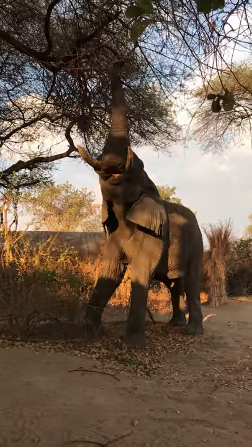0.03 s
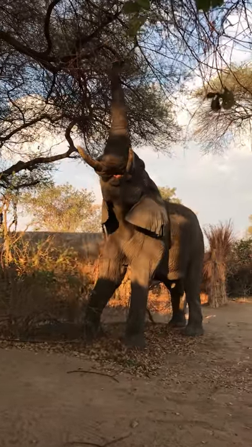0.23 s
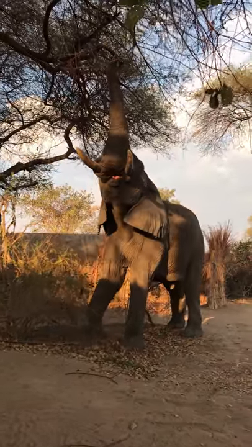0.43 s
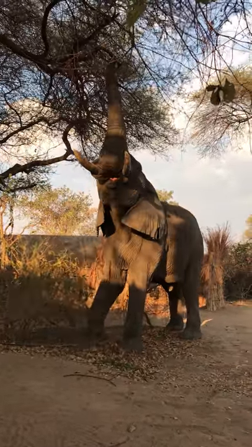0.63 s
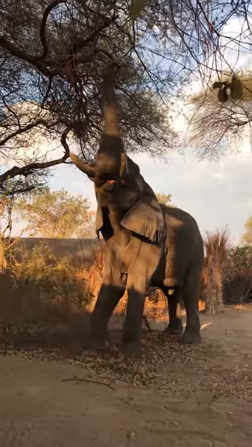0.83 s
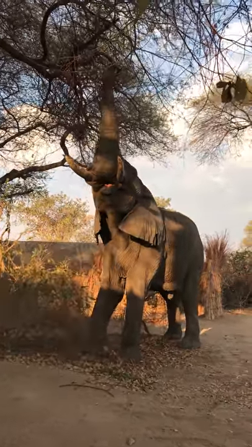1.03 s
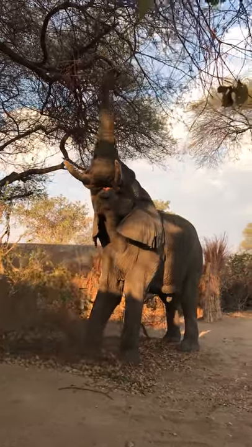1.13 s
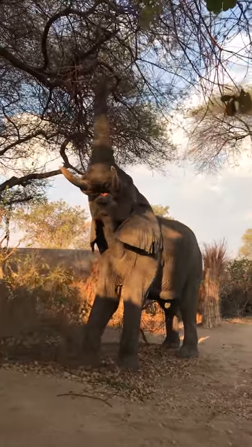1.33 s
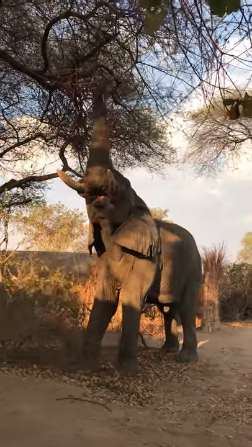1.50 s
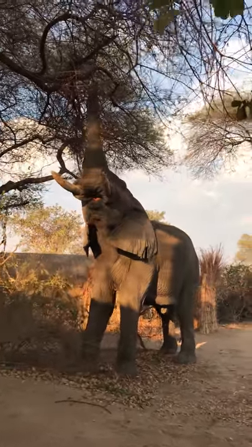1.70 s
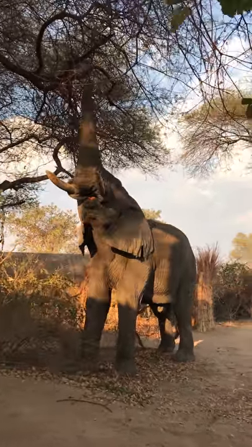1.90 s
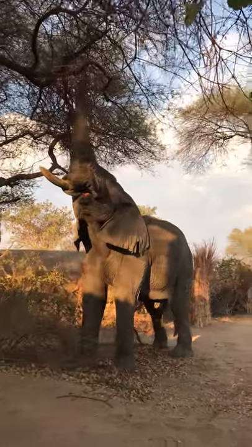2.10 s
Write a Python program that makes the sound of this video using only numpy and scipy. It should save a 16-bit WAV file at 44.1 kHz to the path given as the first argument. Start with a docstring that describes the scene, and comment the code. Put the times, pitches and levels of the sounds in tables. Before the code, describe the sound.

Dry foliage rustles in one long swell as an elephant pulls at a tree. Twigs snap and branches knock softly, then the rustle sinks to a few faint snaps, heard across open ground in quiet outdoor air.

```python
"""An elephant hauls on a thorn tree's crown with its trunk; mono, across open ground.
First, quiet outdoor air and a few twigs snapping, each a run of fibre cracks. By 0.4 s thousands of
dry leaves and twigs tick against each other in one long swell. Up to 1.4 s thick branches knock
and louder twigs snap, over soft, deep bumps. Then the rustle sinks, leaving a few faint snaps."""
import sys
import numpy as np
from scipy import signal
from scipy.io import wavfile
from scipy.ndimage import uniform_filter1d

SR = 44100
rng = np.random.default_rng(int(sys.argv[2]) if len(sys.argv) > 2 else 0)


def master_out(mix):
    """Clip the mix to full scale and print it as 16-bit PCM to the path in sys.argv[1]."""
    frames = np.transpose(np.atleast_2d(mix))
    ceiling = np.clip(frames, -1, 1)
    pcm = np.round(ceiling * 32767).astype(np.int16)
    wavfile.write(sys.argv[1], SR, pcm)


N = 94815

# shake of the crown: t/s, level/dB
SHAKE_ENVELOPE = [(0, -61.5), (.17, -55), (.2, -53.5), (.29, -52.5), (0.381, -43), (.45, -43), (.5, -41),
                  (.56, -42), (.68, -39.5), (.8, -40.5), (.87, -39.5), (1.02, -40.5), (1.16, -44.3),
                  (1.255, -40.5), (1.285, -43), (1.35, -39), (1.44, -45), (1.53, -48.5), (1.62, -54.5),
                  (1.72, -56.5), (1.87, -52.5), (2.02, -61), (2.15, -53.5)]
# dry foliage rustle, including the microphone's dip near 10.5 kHz: f/Hz, relative level/dB
RUSTLE_SPECTRUM = [(60, -15), (130, -8.5), (190, -13), (265, -4.5), (330, -9.5), (460, -11), (800, -10.5),
                   (1100, -4), (2000, -2.5), (3000, -1), (4200, 1), (4900, -2), (5400, 0), (6500, -0.5),
                   (7600, -4.5), (9500, -3), (10400, -9.5), (11900, -4.5), (14000, -9), (16000, -20.5)]
# extra filter on single ticks: f/Hz, level/dB
TICK_EQ = [(300, -9.5), (1500, -6), (4000, -0.5), (8000, -0.5), (15000, 5)]


def rustle(peak_ticks_per_s=2600, ticks_db=-6, hiss_db=-0.5, clump_db=2, swish_db=0.7):
    """A harder shake makes leaves collide more often and more strongly."""
    shake = amp(np.interp(np.arange(N) / SR, *np.transpose(SHAKE_ENVELOPE)))
    crowding = (shake / shake.max()) ** 0.7
    clumps = wander(step_s=0.011)  # leaves collide in clumps
    ticks = leaf_ticks(peak_ticks_per_s * crowding, low_hz=840, high_hz=15340, spread_db=3)
    ticks = ticks / np.sqrt(crowding) * amp(clump_db * clumps)  # power independent of rate
    ticks = unit(scatter(colour(colour(ticks, RUSTLE_SPECTRUM), TICK_EQ)))
    hiss = unit(colour(leaf_hiss(), RUSTLE_SPECTRUM) * amp(swish_db * clumps))
    return shake * (amp(ticks_db) * ticks + amp(hiss_db) * hiss)


def leaf_ticks(rate_per_s, low_hz, high_hz, spread_db, pitches=32, decay_cycles=2.1):
    """Sparse contacts, each ringing one leaf or twig for a few cycles."""
    out, t = np.zeros(N), np.arange(SR // 100) / SR
    sizes = amp(spread_db * np.minimum(rng.exponential(1, N), 3.6))
    contacts = rng.random(N) < rate_per_s / SR
    pitch_index = rng.integers(0, pitches, N)
    impulses = sizes * contacts * rng.choice([-1, 1], N)
    for k, hz in enumerate(np.linspace(low_hz, high_hz, pitches)):
        ring = np.sin(2 * np.pi * hz * t) * np.exp(-t * hz / decay_cycles)
        out += signal.oaconvolve(impulses * (pitch_index == k), unit(ring))[:N]
    return unit(out)


def leaf_hiss(patch_db=0.5, frame=256):
    """Countless faint leaf contacts merge into a patchy hiss."""
    spectrogram = signal.stft(rng.standard_normal(N), nperseg=frame)[2]
    patches = uniform_filter1d(rng.standard_normal(spectrogram.shape), size=6, axis=0)
    patches = unit(uniform_filter1d(patches, size=8, axis=1))
    return signal.istft(spectrogram * amp(patch_db * patches), nperseg=frame)[1][:N]


# twig breaks: t/s, level/dB, tear time/s, tilt/(dB/octave)
TWIG_BREAKS = [(.044, -50, 0.00061, -3), (.084, -46, 0.00058, 12), (.185, -34.5, 0.00079, 12),
               (.187, -47, 0.0044, -3.5), (0.2147, -47.5, 0.0065, -2), (.2495, -53, 0.0036, -4.5),
               (.4763, -29, 0.0024, 5), (.7625, -35, 0.00088, -3), (0.7656, -36.5, 0.007, -0.5),
               (.8615, -28.5, 0.001, -2.5), (.981, -28, 0.0013, 3), (.994, -34.5, 0.0053, 0),
               (1.0825, -35.5, 0.0035, -3.5), (1.0988, -33.5, .003, -1.5), (1.104, -36.5, 0.0047, 3),
               (1.291, -29.5, 0.0018, 1.5), (1.2935, -31, 0.002, 16.5), (1.3281, -34, 0.0022, 2),
               (1.361, -34, 0.0019, 1.5), (1.5285, -42.5, 0.0017, 0), (1.673, -47, 0.0018, -3.5),
               (1.846, -49.5, .012, -3.5), (2.0455, -45.5, 0.0018, 7), (2.1252, -49.5, 0.0027, 2)]
# snapping twigs, including the microphone's dip near 10.5 kHz: f/Hz, relative level/dB
SNAP_SPECTRUM = [(200, -37), (900, -14.5), (2000, -7), (3800, -4), (6500, -3), (9000, -3.5), (10500, -9),
                 (12000, -5.5), (16000, -13.5)]


def twig_snaps(fibres_per_s=18000, spread_db=3):
    """Each twig breaks as a quick, fading run of fibre cracks."""
    out, t = np.zeros(N), np.arange(SR // 16) / SR
    for start_s, db, tear_s, tilt_db in TWIG_BREAKS:
        cracks = (rng.random(len(t)) < fibres_per_s / SR) | (t == 0)
        sizes = rng.choice([-1, 1], len(t)) * amp(spread_db * rng.standard_normal(len(t)))
        fade = np.exp(-(t / tear_s) ** 2)
        snap = colour(cracks * sizes * fade, SNAP_SPECTRUM, tilt_db)
        add(out, start_s, amp(db) * np.sqrt(tear_s * SR) * snap / np.linalg.norm(snap))
    return scatter(out)


# blows on thick branches: t/s, level/dB, tilt/(dB/octave)
BRANCH_BLOWS = [(.541, -56.5, -3), (.604, -53.5, -5), (0.767, -49, 3.5), (0.784, -54, -14),
                (1.085, -55.5, -5.5), (1.273, -47.5, 2.5), (1.335, -61.5, 0), (1.353, -55, 0.5),
                (1.372, -59, -1)]
# branch modes: nominal f/Hz, relative level/dB, decay/s
BRANCH_MODES = [(81, -8.5, 0.011), (136, -1.5, 0.014), (209, -2, 0.0091), (277, -1, 0.0057),
                (604, -0.5, 0.0046), (805, -0.5, 0.0023), (970, 2.5, 0.0024)]


def branch_knocks(scuff_db=-9, scuff_decay_s=0.0057):
    """Blows ring the heavily damped modes of thick wood, with a scuff of bark."""
    out, t = np.zeros(N), np.arange(SR // 8) / SR
    bark_band = signal.butter(2, [150, 1400], "band", fs=SR, output="sos")
    onset = slice(SR // 100)
    for start_s, db, tilt_db in BRANCH_BLOWS:
        ring = np.zeros(len(t))
        for k, (hz, mode_db, decay_s) in enumerate(BRANCH_MODES):
            gain = (-1) ** k * amp(mode_db + tilt_db * np.log2(hz))
            detune = rng.uniform(0.88, 1.05)
            ring += gain * np.sin(2 * np.pi * hz * detune * t) * np.exp(-t / decay_s)
        scuff = signal.sosfilt(bark_band, rng.standard_normal(len(t))) * np.exp(-t / scuff_decay_s)
        knock = ring / ring[onset].std() + amp(scuff_db) * scuff / scuff[onset].std()
        add(out, start_s, amp(db) * knock)
    return out


# soft, deep bumps: t/s, level/dB, centre f/Hz, length/s
DEEP_BUMPS = [(0, -60.5, 47.7, 0.11), (0.274, -64, 46.3, 0.051), (0.446, -53, 39.4, 0.068),
              (0.779, -59, 64, 0.056), (0.922, -66, 51.5, 0.06), (1.277, -65, 55, .05),
              (1.331, -67, 49.7, 0.055)]


def deep_bumps(pitch_sag=0.66):
    """A few low cycles swell and fade as their pitch sinks."""
    out = np.zeros(N)
    for start_s, db, hz, length_s in DEEP_BUMPS:
        progress = np.linspace(0, 1, int(length_s * SR))
        cycles = np.cumsum(hz * (1 + pitch_sag * (0.5 - progress))) / SR
        swell = np.sin(np.pi * progress ** 0.7)
        add(out, start_s, amp(db) * np.sqrt(2) * swell * np.sin(2 * np.pi * cycles))
    return out


# still outdoor air, relative spectrum: f/Hz, level/dB
AIR_SPECTRUM = [(15, -26), (28, -15), (45, -2.5), (85, -3.5), (140, -0.5), (200, -9), (260, -6), (400, -13),
                (1000, -10), (3000, -17), (8000, -29), (16000, -28)]


def outdoor_air(midway_db=-65.5, rise_db_per_s=2, stray_db=-73.5):
    """A quiet, slowly rising noise floor; stray bits of dry leaf tick throughout."""
    stray = leaf_ticks(rate_per_s=430, low_hz=3940, high_hz=15000, spread_db=7.5)
    stray = unit(scatter(colour(stray, RUSTLE_SPECTRUM)))
    floor = unit(colour(rng.standard_normal(N), AIR_SPECTRUM))
    rise = amp(rise_db_per_s * (np.arange(N) - N / 2) / SR)
    return amp(midway_db) * rise * floor + amp(stray_db) * stray


def scatter(x, echo_db=-5, decay_s=0.02):
    """Adds the short, diffuse echo of crown and ground."""
    t = np.arange(SR // 8) / SR
    tail = rng.standard_normal(len(t)) * np.exp(-t / decay_s) * (t > 0.001)
    return x + amp(echo_db) * signal.fftconvolve(x, tail / np.linalg.norm(tail))[:N]


def colour(x, spectrum, tilt_db=0, size=4096):
    """Minimum-phase, unit-energy filter: spectrum plus tilt_db per octave."""
    table_hz, table_db = np.transpose(spectrum)
    hz = abs(np.fft.fftfreq(size, 1 / SR))
    db = np.interp(np.log(hz + 1), np.log(table_hz + 1), table_db)
    db += tilt_db * np.log2(np.clip(hz, table_hz[0], table_hz[-1]))
    log_response = np.conj(signal.hilbert(np.log(amp(db))))
    taps = np.fft.ifft(np.exp(log_response)).real[:size // 2]
    return signal.fftconvolve(x, taps / np.linalg.norm(taps))[:len(x)]


def wander(step_s):
    """Random curve, rms 1, one point per step_s."""
    return unit(np.interp(np.arange(N) / SR / step_s, np.arange(N), rng.standard_normal(N)))


def amp(db):
    """dB to gain."""
    return 10 ** (np.asarray(db) / 20)


def unit(x):
    """Scales to rms 1."""
    return x / np.sqrt(np.mean(x ** 2) + 1e-20)


def add(mix, start_s, sound):
    """Mixes sound in at start_s."""
    part = mix[round(start_s * SR):][:len(sound)]
    part += sound[:len(part)]


def scene():
    """All sources, identical in both channels."""
    mono = rustle() + twig_snaps() + branch_knocks() + deep_bumps() + outdoor_air()
    return np.tile(mono, (2, 1))


def record(dry):
    """Steep low-pass."""
    cutoff_hz = 16250
    taps = signal.firwin(401, cutoff_hz, window=("kaiser", 8), fs=SR)
    return signal.oaconvolve(dry, taps[None], "same")


dry = scene()
out = record(dry)
master_out(out)
```